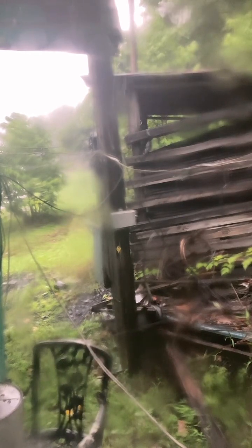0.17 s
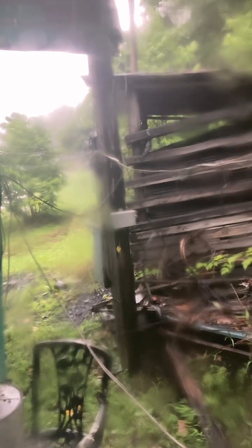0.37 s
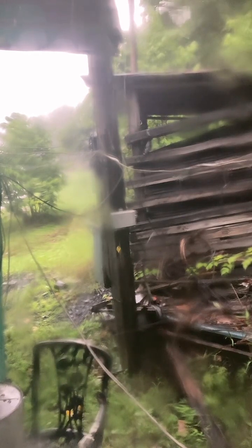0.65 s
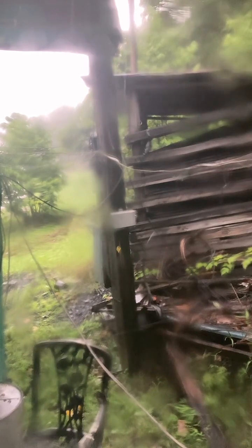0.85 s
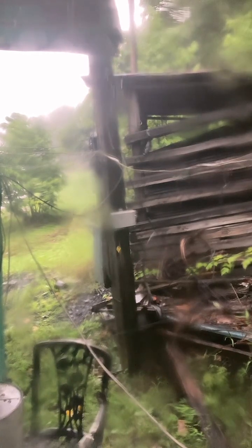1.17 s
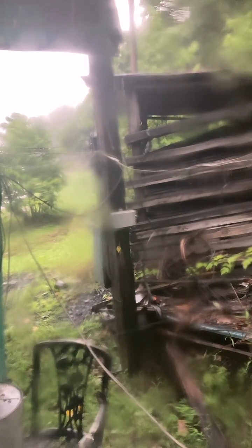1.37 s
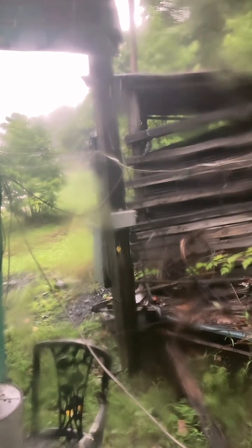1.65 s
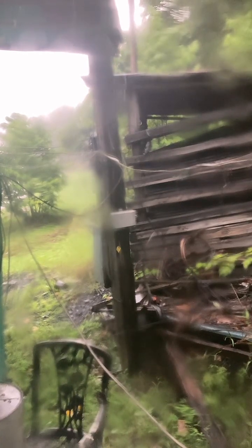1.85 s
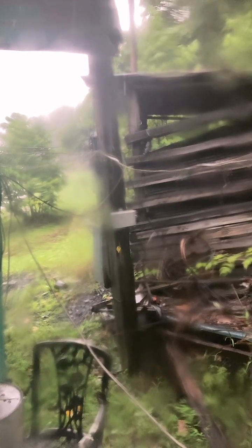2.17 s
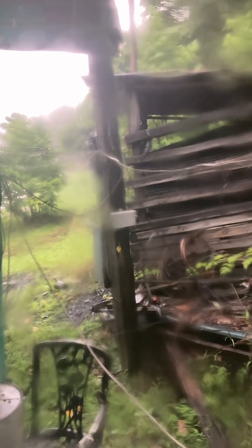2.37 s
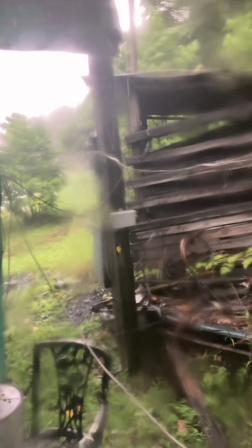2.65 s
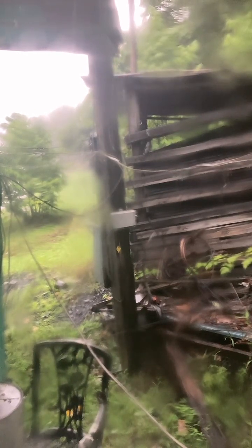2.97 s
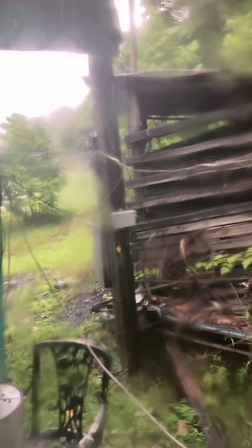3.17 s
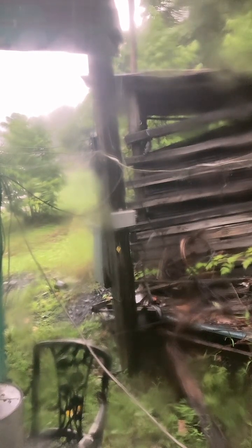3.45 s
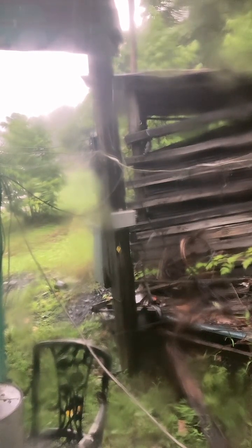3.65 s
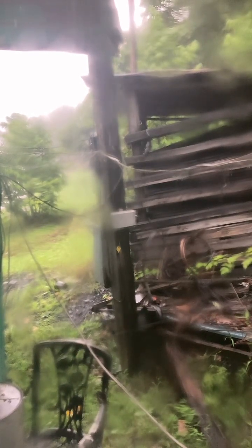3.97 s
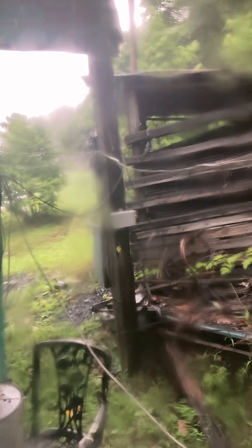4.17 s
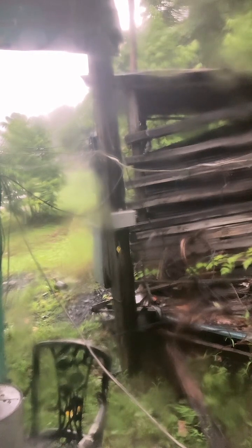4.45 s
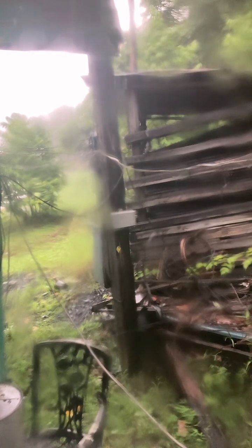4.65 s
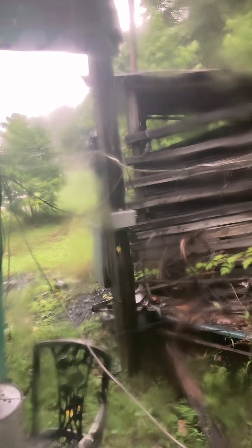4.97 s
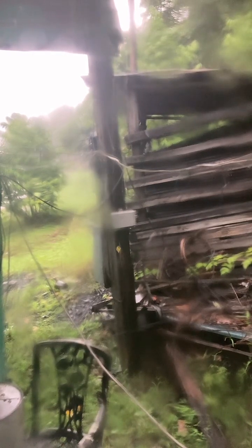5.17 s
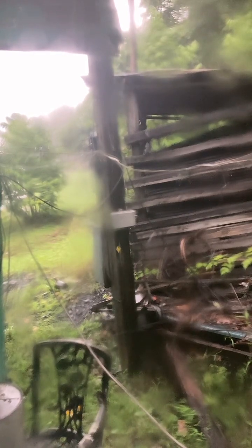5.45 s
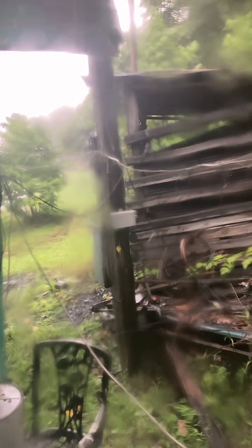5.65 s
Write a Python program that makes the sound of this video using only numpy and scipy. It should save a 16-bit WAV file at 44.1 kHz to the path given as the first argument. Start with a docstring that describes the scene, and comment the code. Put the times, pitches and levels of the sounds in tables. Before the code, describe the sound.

Rain falls outdoors on the thin metal casing of an air conditioner, inches from the microphone. At first only a small grille ping near 0.1 s and light taps, over a soft steady wash of distant rain. From 0.63 to 0.85 s a rapid cluster hits, with two hard ticks at 0.67 and 0.79, the second with a low lid thud. Small splats and slat pings follow until 1.7 s. Then drops crowd in: an uneven, lively rattle from 1.8 to 3 s, strong at 2.19 and loudest at 2.5. After that it thins, with bold separate strikes at 3.76, 3.87, 4.42, 4.47, 5.06 and 5.12 s, and a clear metallic ping at 5.67. Every hit is a bright wet splash with a different brief tinny ring, decaying in under a tenth of a second. Fine spray crackles after big drops; the shelter adds only a faint short tail.

```python
"""Rain on an air conditioner

Raindrops strike the sheet-metal casing of an air conditioner right beside the microphone.
Each lands on another spot: it rings the casing's modes in its own mix under a short, bright splash of noise.
A few also thud on the lid or ping on a slat of the grille; spray, mist and drizzle patter in between.
A shelter adds a faint tail of echoes, and far rain washes over the yard as steady filtered noise."""
import sys
import numpy as np
from scipy import signal
from scipy.fft import rfft, irfft
from scipy.io import wavfile
from scipy.ndimage import uniform_filter1d

SR = 44100
rng = np.random.default_rng(int(sys.argv[2]) if len(sys.argv) > 2 else 0)


def to_wav(sig):
    """Store sig (one row per channel, or 1-D mono) as 16-bit WAV at the path in sys.argv[1].

    Samples outside -1..1 are clipped; the rate is SR.
    """
    pcm = np.clip(np.atleast_2d(sig), -1, 1) * 32767
    pcm = np.round(pcm).astype(np.int16)
    wavfile.write(sys.argv[1], SR, pcm.T)  # frames by channels


N = 256220  # length in samples

# All levels in the tables are relative.
# rain over the yard, spectrum: pitch_hz, density_db (per Hz)
WASH = [(25, -18), (60, -10.5), (150, -6), (400, -9), (1300, -11.5), (3300, -12.5), (4300, -18),
        (5600, -23), (14000, -25.5)]
# drops on the slats of the grille: start_s, splash_db, pitch_hz, level_db, overtone_hz, overtone_db
PINGS = [(0.0895, -30.5, 1993, -29, 4760, -29.5), (0.513, -35.5, 4050, -42, 7560, -39),
         (0.914, -28.5, 2100, -47, 4360, -45), (1.032, -29.5, 2056, -32, 4300, -31.5),
         (1.033, -32.5, 2940, -39, 4710, -37), (1.1454, -36, 1900, -56, 4240, -46),
         (1.4704, -33, 2047, -47, 4320, -56.5), (4.813, -26.5, 2184, -44.5, 4550, -35.5),
         (5.4025, -32.5, 3404, -31, 7630, -36), (5.6675, -16, 1969, -21, 4570, -26)]
# overtones of a slat: ratio (to its first overtone), level_db, t60_s
OVERTONES = [(1, 1, 0.029), (1.503, -15, 0.038), (2.283, -5.5, 0.03)]
# light drops that splat in the film of water: start_s, splash_db
SPLATS = [(0.127, -31), (0.33, -44.5), (0.96, -39), (1.109, -37), (1.258, -35.5), (1.293, -29.5),
          (1.3312, -39), (1.367, -36), (1.4284, -37.5), (1.616, -29.5), (1.676, -36.5), (2.1202, -31.5),
          (2.463, -28), (2.876, -32), (2.889, -29.5), (2.947, -32.5), (3.047, -26), (3.084, -37),
          (3.1217, -36), (3.14, -40), (3.425, -40.5), (3.453, -43.5), (3.713, -27), (3.998, -35.5),
          (4.2313, -29), (4.82, -27), (5.014, -33.5), (5.209, -34), (5.39, -36), (5.5835, -27),
          (5.7377, -36.5), (5.797, -28)]
# drops that stand out on the casing, with their low, middle and stiff modes:
# start_s, splash_db, clank_db, ring_db, ping_db
DROPS = [(0.6305, -18, -55.5, -49.5, -45.5), (0.6653, -4.5, -23, -22.5, -15), (0.6901, -16, -29, -28, -30),
         (0.7285, -19, -42.5, -44.5, -33.5), (0.787, -0.5, -21, -18, -11.5), (0.8123, -26, -34, -30, -38),
         (0.845, -33.5, -40.5, -32, -38), (1.0011, -17.5, -38.5, -29.5, -23),
         (1.7808, -17, -36, -35.5, -35.5), (1.8315, -14.5, -39.5, -48, -31), (1.8983, -11, -26, -32.5, -29),
         (1.9124, -16, -31.5, -32, -19.5), (1.9715, -18, -49, -43.5, -34.5), (2.0578, -16, -45, -47, -29.5),
         (2.1881, -5.5, -22.5, -40, -23.5), (2.206, -26, -36, -38, -29.5), (2.2199, -22.5, -42, -38, -28),
         (2.2807, -15.5, -43.5, -52.5, -37.5), (2.3673, -12.5, -37, -34.5, -33.5),
         (2.3745, -12, -43.5, -29.5, -40), (2.4447, -21, -42.5, -38.5, -44.5),
         (2.5032, -0.5, -21, -14, -11), (2.5254, -23, -33.5, -30.5, -29.5),
         (2.5975, -9, -26.5, -24.5, -30.5), (2.6507, -17.5, -54, -37, -44), (2.6603, -19.5, -35, -34, -41),
         (2.6822, -15.5, -65, -40.5, -38), (2.7352, -6, -51, -27.5, -21), (2.7586, -18, -52.5, -51, -49),
         (2.7636, -8.5, -40.5, -32.5, -28), (2.816, -17, -78, -57.5, -41), (2.8314, -13, -78, -51.5, -34.5),
         (2.9238, -17, -54.5, -71, -40.5), (3.0412, -28, -36, -32.5, -36), (3.2845, -24, -49, -52, -31.5),
         (3.3898, -17, -58, -41.5, -46), (3.596, -17.5, -44.5, -47.5, -38),
         (3.7577, -2.5, -34.5, -30.5, -21.5), (3.7966, -23, -57, -66.5, -31),
         (3.8711, 0, -33.5, -22.5, -14.5), (4.0615, -21.5, -52.5, -43.5, -36.5),
         (4.2799, -22, -60.5, -38, -42.5), (4.4166, -7, -47.5, -43.5, -17.5),
         (4.4738, -7, -39, -20.5, -18.5), (4.5305, -23.5, -31, -36.5, -38),
         (4.6198, -23.5, -57.5, -49.5, -45), (4.9414, -19, -54.5, -49.5, -31.5),
         (5.0553, -4, -38.5, -33, -19), (5.1169, -1, -28.5, -23, -29), (5.2899, -13, -40, -36.5, -38.5)]
# the water film softens the attack: splash_db, rise_s
CUSHION = [(-29.5, 0.00033), (-22.5, 0.0012), (0, 0.00029)]
# colour of the splash: pitch_hz, level_db
SPLASH = [(300, -37.5), (900, -12.5), (2700, -11), (3200, -5), (4300, 4), (5800, 1.5), (6900, 3.5),
          (7350, 9), (8300, 8), (9300, 3), (10800, 3), (12900, -11)]
# modes of the casing: pitch_hz, level_db, t60_s (before the limit on ringing)
CASING = [(642, -10.5, 0.081), (765, 0, 0.045), (873.7, 2.5, 0.045), (955.3, -2.5, 0.059), (1020, 9, 0.014),
          (1302, -3, 0.052), (1346, 9.5, 0.053), (1847, 9, 0.041), (1977, 7.5, 0.027), (2061, 3, 0.057),
          (2258, 6, 0.023), (2340, -5.5, 0.052), (3101, 1.5, 0.04), (3264.5, 6, 0.053), (3375.5, 7, 0.045),
          (3644, 2.5, 0.05), (3912, -1, 0.073), (4238, -1, 0.043), (4887, 2, 0.024), (5580, 0, 0.028),
          (6430, 2, 0.026), (7325, -0.5, 0.03)]
# borders between the four families of casing modes: pitch_hz
FAMILY_EDGES_HZ = [1550, 2800, 4100]
# blows on the slack middle of the lid: start_s, level_db, pitch_ratio (to the lid's modes)
THUDS = [(0.788, -28.5, .97), (0.848, -44.5, 1.12), (3.043, -47.5, .95), (3.875, -34, 1.02),
         (4.419, -42, 1.1), (4.476, -31, 1.14), (5.118, -42.5, .92)]
# modes of the lid: pitch_hz, level_db, t60_s
LID = [(377.3, 2, 0.075), (449.4, 1.5, 0.075), (714, 7, 0.1), (861, 9, 0.053)]
# reverberation of the shelter: pitch_hz, t60_s
SHELTER = [(300, 0.46), (1000, 0.21), (8000, 0.11)]

WASH_DB = -60.5  # rms of the far rain
LONGEST_RING_CYCLES = 270  # wet metal fades by 60 dB within this many cycles
DROP_S, STRIKE_S = .15, .01  # length of a drop's sound, and of the first moments that set its level
SPRAY_FADE_DB_PER_S = 97.5  # the longer a droplet of spray flies, the lighter it is
EDGE_HZ = 13350  # upper band limit


def gain_of(db):
    """Decibels to amplitude."""
    return 10 ** (np.asarray(db) / 20)


def evened(x):
    """Scales to rms 1."""
    return x / np.sqrt(np.mean(x ** 2) + 1e-20)


def struck(x):
    """Scales a blow so that its first moments have rms 1."""
    first = x[..., :round(STRIKE_S * SR)]
    return x / np.sqrt(np.mean(first ** 2) + 1e-20)


def decay(t, t60):
    """Exponential fade that falls by 60 dB in t60, given in the unit of t."""
    return np.exp(-np.log(1000) * t / t60)


def drop_time():
    """Time axis of one drop in seconds."""
    return np.arange(round(DROP_S * SR)) / SR


def read(points, hz):
    """Reads a table on a log-frequency axis."""
    f, value = np.transpose(points)
    return np.interp(np.log(hz + 1), np.log(f + 1), value)


def add(mix, s, sound):
    """Mixes a sound in at time s."""
    part = mix[max(round(s * SR), 0):][:len(sound)]
    part += sound[:len(part)]


def coloured(x, points, tilt_db, uneven_db, size=512):
    """Minimum-phase filter: a spectrum, tilted in dB per octave in the treble, with random humps and notches."""
    hz = abs(np.fft.fftfreq(size, 1 / SR))
    knots = np.linspace(0, SR / 2, num=size // 10)
    humps = np.interp(hz, knots, rng.standard_normal(len(knots)))
    treble_octaves = np.log2(np.maximum(hz / FAMILY_EDGES_HZ[-1], 1))
    db = read(points, hz) + tilt_db * treble_octaves + uneven_db * humps
    # the Hilbert transform of the log spectrum gives the phase of a causal filter
    response = np.exp(np.conj(signal.hilbert(np.log(gain_of(db)))))
    taps = np.fft.ifft(response).real
    return signal.oaconvolve(x, taps)[:len(x)]


def yard():
    """A steady wash of far rain: noise with a fixed spectrum."""
    spectrum = rfft(rng.standard_normal(N))
    wash = irfft(spectrum * gain_of(read(WASH, np.fft.rfftfreq(N, 1 / SR))), N)
    return gain_of(WASH_DB) * evened(wash)


def slat(splash_db, hz, db, overtone_hz, overtone_db, ring_cycles=95, rise_s=0.00144, linger=0.115):
    """A drop on a slat of the grille: a ping roughened by the water.
    Its low note dies quickly, then lingers faintly; the higher this note, the shorter it rings."""
    t = drop_time()
    fade = decay(t * hz, ring_cycles) + linger * decay(t * hz, LONGEST_RING_CYCLES)
    low = np.sin(2 * np.pi * hz * t) * fade
    high = np.zeros(len(t))
    for ratio, level, t60 in OVERTONES:
        high += gain_of(level) * np.sin(2 * np.pi * overtone_hz * ratio * t) * decay(t, t60)
    slow_noise = signal.sosfilt(signal.butter(4, 250, fs=SR, output="sos"), rng.standard_normal(len(t)))
    rough = 1 + .3 * evened(slow_noise)
    shape = rough * (1 - np.exp(-t / rise_s)) ** 2
    ping = gain_of(db) * struck(low * shape) + gain_of(overtone_db) * struck(high * shape)
    return droplet(splash_db) + ping


def droplet(db, clank_db=-21, ring_db=-18, ping_db=-18, spread_db=3):
    """A light drop: mostly splash, with a little of the casing in a chance mix."""
    a, b, c = spread_db * rng.standard_normal(3)
    return drop(db, db + clank_db + a, db + ring_db + b, db + ping_db + c)


def drop(splash_db, clank_db, ring_db, ping_db,
         metal_db=-3, water_db=-15, tink_db=-19, neutral_db=-30, dulling=0.26):
    """One drop: ringing metal under a splash, which is duller where the stiff modes ping louder.
    The water on the metal cushions the attack by size, most of all for middling drops."""
    t = drop_time()
    families_db = [clank_db + metal_db, ring_db + metal_db, ping_db + metal_db, splash_db + tink_db]
    metal = casing(t, families_db)
    bright_db = dulling * (neutral_db - ping_db) + rng.standard_normal()
    sound = metal + gain_of(splash_db + water_db) * splash(t, splash_db, bright_db)
    cushion_s = np.interp(splash_db, *np.transpose(CUSHION))
    softened = sound * (1 - np.exp(-t / cushion_s)) ** 2
    return softened * np.linalg.norm(sound) / np.linalg.norm(softened)  # same energy as before


def splash(t, size_db, bright_db, slap_db=9, slap_growth=1.0, fizz_s=0.0042, lumpy_db=5, lump_s=0.0016,
           collapse_s=.004, collapse=.9, bounce=.6, bounce_s=.0012):
    """A slap of water, harder the bigger the drop, a lumpy fizz as its crown breaks up, a second slap as it collapses.
    Sheet metal close by reflects it, with another delay for each spot: every drop has its own hollow colour."""
    slap_s, rise_s = .0012, .0006
    lumps = np.interp(t / lump_s, np.arange(64), rng.standard_normal(64))
    slap = gain_of(slap_db + slap_growth * size_db) * np.exp(-t / slap_s)
    second_size = collapse * rng.random()
    second_s = collapse_s * (.5 + rng.random())
    second = second_size * np.exp(-abs(t - second_s) / rise_s)
    fizz = gain_of(lumpy_db * lumps) * np.exp(-t / fizz_s)
    shape = (slap + second + fizz) * (1 - np.exp(-t / rise_s))
    burst = rng.standard_normal(len(t)) * shape
    delay_s = bounce_s * (.5 + rng.random())
    burst = burst + bounce * np.roll(burst, round(delay_s * SR))
    return struck(coloured(burst, SPLASH, bright_db, uneven_db=5.2))


def casing(t, family_db, narrowing_per_octave=4):
    """The casing's modes in four families from low to high, each stirred to its own level.
    When one of the lower three leads, the drop has hit the belly of its strongest mode:
    the neighbours fall away and a pitched plink is left."""
    modes = ringing(t, CASING)
    hz, db = np.transpose(CASING)[:2]
    family = np.digitize(hz, FAMILY_EDGES_HZ)
    lower_db = family_db[:-1]
    leads_db = np.append(np.maximum(lower_db - np.median(lower_db), 0), 0)
    out = np.zeros(len(t))
    for k, (level, lead) in enumerate(zip(family_db, leads_db)):
        own = family == k
        strongest_hz = hz[own][np.argmax(db[own])]
        octaves = abs(np.log2(hz[own] / strongest_hz))
        shares = gain_of(-narrowing_per_octave * lead * octaves)
        out += gain_of(level) * struck(shares @ modes[own])
    return out


def ringing(t, table, rise_cycles=1.98, uneven_db=5.0, wet=0.02):
    """One row a mode: the spot that is hit sets its share and sign, the water film shifts its pitch a little.
    A mode needs a few cycles to build up, so the low ones bloom after the tick."""
    hz, db, t60 = np.transpose(table)[:, :, None]
    share, sign, shift = rng.standard_normal((3, len(hz), 1))
    ring_s = np.minimum(t60, LONGEST_RING_CYCLES / hz)
    fade = np.exp(np.float32(-np.log(1000) / ring_s * t))
    size = np.sign(sign) * gain_of(db + uneven_db * share) * fade
    tone = np.sin(np.float32(2 * np.pi * hz * (1 + wet * shift) * t))
    build_up = (1 - np.exp(np.float32(-t * hz / rise_cycles))) ** 2
    return size * tone * build_up


def lid_thud(db, pitch):
    """A blow flexes the slack middle of the lid, which rings its few low modes at a shifted pitch."""
    modes = ringing(drop_time(), np.array(LID) * [pitch, 1, 1], rise_cycles=1.2, uneven_db=1)
    return gain_of(db) * struck(modes.sum(0))


def single_drops():
    """The timed drops: on the grille, in the water film, on the casing, and the lid's thud under some."""
    out = np.zeros(N)
    for table, source in [(PINGS, slat), (SPLATS, droplet), (DROPS, drop), (THUDS, lid_thud)]:
        for s, *strike in table:
            add(out, s, source(*strike))
    return out


def landings():
    """Time and splash level of every drop on grille, water film and casing, in order."""
    return np.array(sorted(tuple(row[:2]) for row in DROPS + PINGS + SPLATS))


def spray(count=260, flight_s=.026, splash_db=-40.5, follows=0.22, spread_db=3.0):
    """Spray thrown up by the drops falls back on the casing a moment later.
    Big drops throw more and heavier droplets; the lightest fly longest."""
    out = np.zeros(N)
    times, sizes_db = landings().T
    thrown = gain_of(sizes_db) ** .55
    # share the droplets out in proportion to what each drop throws
    parent = np.searchsorted(np.cumsum(thrown) / thrown.sum(), (np.arange(count) + .5) / count)
    flights = flight_s * rng.gamma(2, 1, count)
    levels_db = splash_db + follows * (sizes_db[parent] - sizes_db.mean()) - SPRAY_FADE_DB_PER_S * flights
    levels_db = levels_db + spread_db * rng.standard_normal(count)
    for s, db in zip(times[parent] + flights, levels_db):
        add(out, s, droplet(db))
    return out


def mist(mist_db=-44, fade_s=0.02, specks_per_s=3000, spread_db=2, bright_db=-6.0):
    """The finest spray of each splash settles as a ragged crackle that fades; it builds up where drops crowd."""
    thrown = np.zeros(N)
    for s, splash_db in landings():
        add(thrown, s, gain_of([splash_db]))
    airborne = signal.lfilter([1], [1, -np.exp(-1 / (fade_s * SR))], thrown)
    hits = rng.random(N) < specks_per_s / SR
    specks = hits * gain_of(spread_db * rng.standard_normal(N)) * rng.choice([-1, 1], N)
    crackle = evened(coloured(specks, SPLASH, bright_db, uneven_db=0))
    return gain_of(mist_db) * np.sqrt(airborne) * crackle


def drizzle(count=10, splash_db=-46, spread_db=4):
    """Fine drops reach the casing at chance times, one in each equal stretch."""
    out = np.zeros(N)
    for k, (when, size) in enumerate(rng.random((count, 2))):
        s = (k + when) / count * N / SR
        add(out, s, droplet(splash_db + spread_db * (2 * size - 1)))
    return out


def blurred(x, ahead_s=.0195, double_db=-29, swell_db=-19, swell_s=0.0069):
    """The ticks sound slightly blurred: each swells in over a few milliseconds and has a faint double just ahead."""
    before = np.arange(round(ahead_s * SR), 0, -1) / SR
    swell = rng.standard_normal(len(before)) * np.exp(-before / swell_s)
    lead = gain_of(swell_db) * swell / np.linalg.norm(swell)
    lead[0] += gain_of(double_db)
    return signal.oaconvolve(x, np.append(lead, 1))[len(lead):][:N]


def echoes(first_s=0.0066, echoes_per_s=1200):
    """Scattered reflections from the walls and roof, each band dying at its own speed."""
    taps = rng.standard_normal(SR // 2) * (rng.random(SR // 2) < echoes_per_s / SR)
    hz, t, z = signal.stft(taps, SR, nperseg=256)
    fade = gain_of(-60 * t / read(SHELTER, hz)[:, None])
    tail = signal.istft(z * fade, SR, nperseg=256)[1]
    tail_s = np.arange(len(tail)) / SR
    tail = tail * (1 - np.exp(-(tail_s / first_s) ** 2))
    return tail / np.linalg.norm(tail)


def shelter(x, count=5):
    """Each landing spot has its own paths to the walls: a few sets of echoes take turns from drop to drop."""
    starts_s = np.sort([row[0] for row in DROPS])
    spot = np.searchsorted(starts_s, np.arange(N) / SR) % count
    out = np.zeros(N)
    for k in range(count):
        turn = uniform_filter1d(1. * (spot == k), size=64)  # short crossfades
        out += signal.fftconvolve(x * turn, echoes())[:N]
    return out


def scene(shelter_db=-21.5):
    """Drops on the casing close by, their reflections and the rain beyond, alike in both channels."""
    near = blurred(single_drops() + spray() + drizzle())
    mix = near + gain_of(shelter_db) * shelter(near) + yard() + mist()
    return np.tile(mix, (2, 1))


def suppressor(x, threshold_db=-95, size=1024):
    """Noise suppression: bands that sink to the threshold are turned down, so the treble hushes between drops."""
    z = signal.stft(x, nperseg=size)[2]
    power = uniform_filter1d((abs(z) ** 2).mean(0), size=9, axis=0)  # smoothed over neighbouring bands
    gain = power / (power + gain_of(threshold_db) ** 2)
    return signal.istft(z * gain, nperseg=size)[1][:, :N]


def ports(x):
    """Two close microphone ports: alike in the bass, a little out of phase in the treble."""
    hz = np.fft.rfftfreq(N, 1 / SR)
    phase = np.interp(hz, [3900, 4800], [0, .33]) * np.sin(2 * np.pi * hz / 480)  # radians
    return irfft(rfft(x) * np.exp(1j * np.outer([1, -1], phase)), N)


def record(dry, ceiling=1.05):
    """Noise suppression, clipping of the loudest peaks, the two microphone ports and the band limit."""
    x = ports(np.clip(suppressor(dry), -ceiling, ceiling))
    limit = signal.firwin(255, EDGE_HZ, window=("kaiser", 7), fs=SR)
    return signal.oaconvolve(x, limit[None], "same", axes=1)


dry = scene()
out = record(dry)
to_wav(out)
```